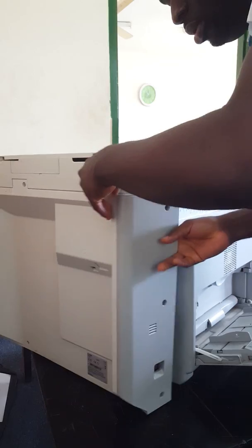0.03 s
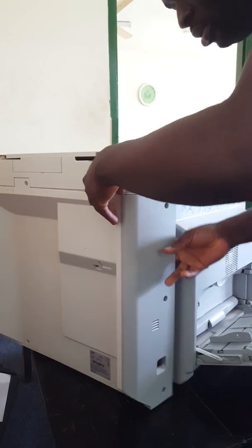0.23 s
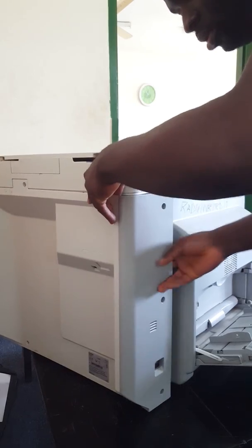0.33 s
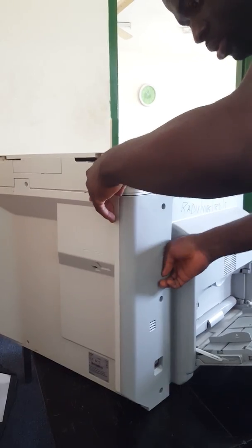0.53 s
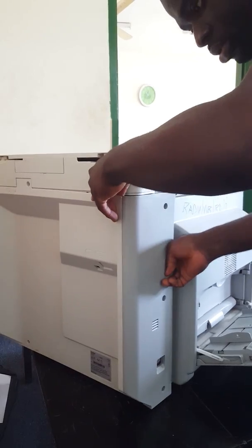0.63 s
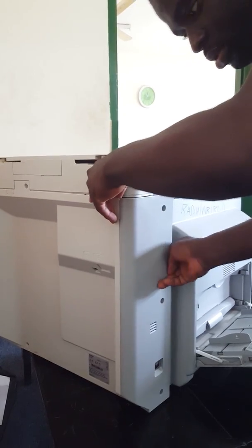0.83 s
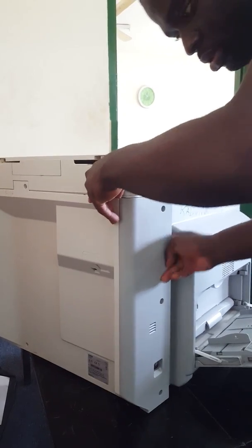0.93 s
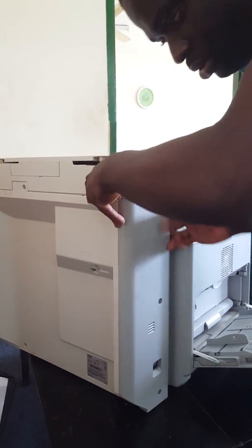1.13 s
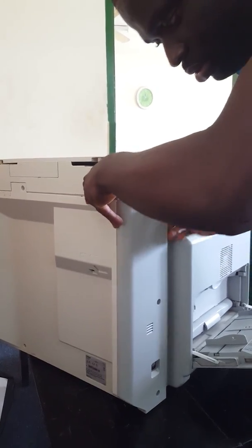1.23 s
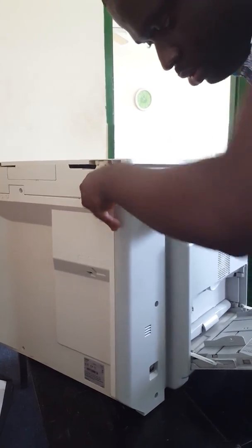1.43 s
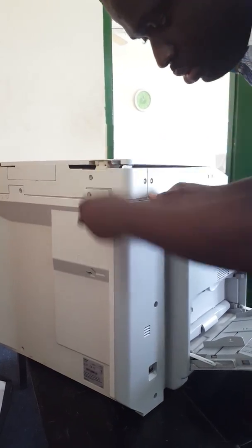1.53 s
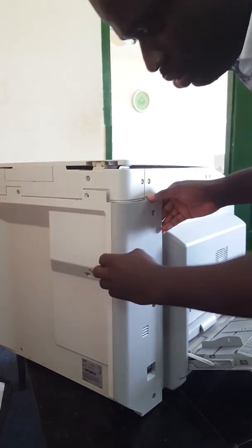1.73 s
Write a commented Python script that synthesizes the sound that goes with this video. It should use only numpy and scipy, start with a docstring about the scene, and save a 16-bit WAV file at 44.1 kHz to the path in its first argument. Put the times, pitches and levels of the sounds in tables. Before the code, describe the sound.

A large copier's plastic side panel slams at about 0.2 seconds, ringing briefly and booming the hollow cabinet. A dull knock and latch clicks follow around 0.5 to 0.6 seconds, then faint rubbing and ticks. At about 1.2 seconds the panel clatters shut in several quick knocks, with a smaller knock at 1.5. Steady noise and a low hum fill the small room underneath.

```python
"""Copier side panel pushed shut

A large copier's plastic panel, pushed home by hand in a small room, slams once, knocks and latches,
then clatters shut. Each blow rings the panel and booms the hollow cabinet. Between blows the panel
rubs on its frame and flexes, and its catches tick. Steady room noise and a low hum lie underneath."""
import sys
import numpy as np
from scipy import signal
from scipy.fft import rfft, irfft
from scipy.io import wavfile

SR = 44100
rng = np.random.default_rng(int(sys.argv[2]) if len(sys.argv) > 2 else 0)


def digitize_waveform(pressure):
    """Quantize a signal to 16-bit integers and store it at the path in sys.argv[1].

    Rows of a 2-D input are taken as channels; values are limited to [-1, 1].
    """
    field = np.atleast_2d(pressure).T
    bounded = np.clip(field, -1, 1)
    quanta = np.round(bounded * 32767).astype(np.int16)
    wavfile.write(sys.argv[1], SR, quanta)


N = 79380
TAIL_SAMPLES = 24576
BASS_SHELF_HZ, TREBLE_SHELF_HZ = 456, 1686

# room decay: f/Hz, t60/s
ROOM_DECAY = [(80, 0.75), (300, 0.45), (1000, 0.4), (3000, 0.26), (7000, 0.28), (14000, 0.11)]
# room field, left to right: f/Hz, correlation
ROOM_CORRELATION = [(60, 0.98), (160, 1), (350, 0.81), (700, 0.63), (1400, -0.33), (3000, 0.037), (8000, 0)]


def panel_knocks():
    """Each blow rattles and rings the panel and sets the cabinet booming."""
    # t/s, level/dB, bass/dB, treble/dB, panel ring/dB, cabinet boom/dB
    blows = [(0.1199, -29, -25, 0, -12, 6), (0.2326, -13.5, -6.5, 2.5, 1.5, 2),
             (0.2367, -21, 4, 17.5, -27, 0.5), (0.2556, -23.5, 13, -12, -9, 3),
             (1.072, -39.5, 17, -12, -25, -18), (1.2202, -24.5, 14, -9, -12, -21),
             (1.2371, -27.5, 14, -13.5, 10, -24), (1.2454, -22, 5, -3.5, -23, -38),
             (1.264, -25.5, -2, -18, 4.5, -28), (1.32, -31.5, 1, -29, 2, -4), (1.459, -42.5, -2, 4, 4, -8),
             (1.503, -27, 4, -17.5, -8, -7.5)]
    # panel resonances: f/Hz, level/dB, t60/s
    panel_modes = [(326, -12.5, 0.49), (458.5, -17.5, 0.41), (522, -10.5, 0.18), (604, -11, 0.12),
                   (662.3, -1, 0.15), (751, -11.5, 0.28), (837.5, -1.5, 0.19), (891, -7.5, 0.18),
                   (1259, -8, 0.26), (1402, -31, 0.22), (1678, -0.5, 0.1), (1841, -0.5, 0.11),
                   (2050, -36, 0.54), (2540, -10.5, 0.061), (2650, -23, 0.22), (3130, -25, 0.31)]
    # hollow cabinet resonances: f/Hz, level/dB, t60/s
    cabinet_modes = [(63.6, -10, 0.61), (78, -10, 0.27), (102, -15.5, 0.68), (175.5, -11.5, 0.29),
                     (199.7, -14, 0.7)]
    # f/Hz, level/dB
    blow_spectrum = [(30, -34), (80, -13.5), (250, -12), (420, -0.5), (720, -0.5), (1050, -4.5), (1750, -5),
                     (2600, -16), (4000, -27), (4600, -33.5), (7000, -46), (9800, -61.5), (11500, -47.5),
                     (16000, -52)]
    out = np.zeros((2, N))
    for start_s, db, bass_db, treble_db, ring_db, boom_db in blows:
        blow = colour(impact(contact_db=12), blow_spectrum, bass_db, treble_db)
        panel = amp(ring_db) * ring(panel_modes, rise_s=0.00065, treble_db=treble_db)
        boom = amp(boom_db) * ring(cabinet_modes, rise_s=0.019)
        add(out, start_s, amp(db) * (blow + panel + boom))
    return out


def catch_clicks():
    """Catches and small plastic parts snap and ring briefly."""
    # t/s, level/dB, treble/dB
    clicks = [(.0962, -61, 23.5), (.4155, -41.5, 6), (.429, -32.5, -8), (.5282, -29.5, -4),
              (0.5793, -25, 0), (.7003, -41.5, -4), (.8679, -34.5, -8), (1.051, -54, 11), (1.066, -43.5, 2),
              (1.2383, -42.5, 9), (1.2625, -33.5, 7), (1.5015, -36, 0.5)]
    # f/Hz, level/dB
    snap_spectrum = [(30, -30), (250, -3), (900, -10), (1500, -8.5), (2300, -10), (4000, -20.5),
                     (4600, -27.5), (7500, -38), (9800, -52), (11500, -43), (16000, -41)]
    # catch resonances: f/Hz, level/dB, t60/s
    catch_modes = [(943, 0, 0.092), (1294, -0.5, 0.13), (1864, -7, 0.1), (2140, -2, 0.07),
                   (2410, -23, 0.076), (2930, -23, 0.049), (3520, -6.5, 0.05), (3850, -12.5, 0.081),
                   (5540, -30, 0.2)]
    out = np.zeros((2, N))
    for start_s, db, treble_db in clicks:
        snap = colour(impact(contact_db=11.5), snap_spectrum, treble_db=treble_db)
        catch = ring(catch_modes, rise_s=0.0005, treble_db=treble_db)
        add(out, start_s, amp(db) * (snap + catch))
    return out


def panel_flex():
    """The panel gives under the hand: one low, damped tone per bump."""
    # t/s, level/dB, f/Hz, t60/s
    bumps = [(0.096, -30, 195.8, 0.24), (.157, -25, 341, 0.088), (.385, -32.5, 269.1, 0.4),
             (0.5102, -8, 410, 0.021), (0.531, -9.5, 376, 0.025), (0.603, -25.5, 189, 0.17),
             (0.641, -24, 236, 0.035), (0.662, -22, 254, 0.039), (1.112, -33.5, 185, 0.35),
             (1.251, -23.5, 178.8, 0.38), (1.43, -24.5, 343, 0.033), (1.496, -32, 63.1, 0.41),
             (1.524, -27.5, 187.7, 0.23)]
    out, t = np.zeros((2, N)), np.arange(TAIL_SAMPLES) / SR
    for start_s, db, hz, t60_s in bumps:
        envelope = rise(t, rise_s=0.0017) * decay(t, t60_s)
        add(out, start_s, amp(db) * envelope * np.sin(2 * np.pi * hz * t))
    return out + amp(-10) * room_echo(out)


def panel_rubs():
    """The panel slides on its frame, plastic on plastic, in many tiny slips."""
    # t/s, length/s, level/dB
    slides = [(0, 0.37, -45), (0.167, 0.041, -36.5), (0.399, 0.044, -39), (0.536, 0.059, -27.5),
              (0.771, 0.035, -38), (0.839, 0.073, -44), (1.062, 0.097, -48), (1.222, 0.06, -24.5),
              (1.457, 0.026, -37.5), (1.722, 0.028, -53)]
    # f/Hz, level/dB
    rub_spectrum = [(30, -22.5), (200, -5), (450, 1), (900, -2), (1900, -14.5), (3000, -24), (8000, -54),
                    (16000, -59)]
    slips_per_s, spread_db = 2000, 1
    slipping = rng.random(N) < slips_per_s / SR
    slips = unit(slipping * rng.standard_normal(N) * amp(spread_db * rng.standard_normal(N)))
    envelope = np.zeros((2, N))
    for start_s, length_s, db in slides:
        add(envelope, start_s, amp(db) * np.sqrt(np.hanning(round(length_s * SR)).clip(0)))
    friction = colour(envelope * slips, rub_spectrum)
    return 0.88 * friction + 0.73 * room_echo(friction)


def impact(contact_db):
    """A sharp contact, the plastic's brief rattle and the room's answer."""
    # f/Hz, t60/s
    rattle_decay = [(100, 0.095), (600, 0.12), (2000, 0.094), (5000, 0.08), (14000, 0.045)]
    # near field, left to right: f/Hz, correlation
    near_correlation = [(100, 0.95), (700, .95), (1500, .6), (3000, 0.02), (8000, 0)]
    room_db, rattle_db = -5.5, 1.5
    t = np.arange(TAIL_SAMPLES) / SR
    out = amp(room_db) * noise_tail(ROOM_CORRELATION, ROOM_DECAY, TAIL_SAMPLES) * rise(t, rise_s=0.008)
    add(out, 0, amp(rattle_db) * noise_tail(near_correlation, rattle_decay, TAIL_SAMPLES // 2))
    out[:, 0] -= amp(contact_db)
    return out


def ring(modes, rise_s, treble_db=0):
    """Modes struck from rest; the higher ones reach the two microphones out of phase."""
    t, out = np.arange(TAIL_SAMPLES) / SR, 0
    for k, (hz, db, t60_s) in enumerate(modes):
        correlation = np.clip(at_hz(ROOM_CORRELATION, hz), -1, 1)
        offset_rad = np.arccos(correlation) * rng.choice([-.5, .5])
        tone = np.sin(2 * np.pi * hz * t + np.array([[offset_rad], [-offset_rad]]))
        gain = (-1) ** k * amp(db + treble_db * treble_share(hz))
        out = out + gain * decay(t, t60_s) * tone
    return out * rise(t, rise_s)


def room_echo(x):
    """Diffuse reverberation of the small room."""
    tail = unit(noise_tail(ROOM_CORRELATION, ROOM_DECAY, TAIL_SAMPLES)) / np.sqrt(TAIL_SAMPLES)
    return signal.fftconvolve(x, tail, axes=1)[:, :N]


def room_noise():
    """Steady noise with a wavering low hum."""
    # f/Hz, level/dB
    noise_spectrum = [(15, -24.5), (25, -5), (42, -5.5), (60, -5), (85, 1.5), (135, -3), (184, -4),
                      (235, -4), (330, -1), (480, -7.5), (750, -7.5), (1360, -10.5), (2730, -23.5),
                      (4500, -37), (7000, -47), (9800, -55), (12000, -50), (16000, -45.5)]
    # f/Hz, level/dB
    hum_tones = [(188, -46.5), (334, -65.5)]
    _, white = stereo_spectra(ROOM_CORRELATION, N)
    noise = amp(-39) * colour(irfft(white, N), noise_spectrum)
    t, hum, width_hz = np.arange(N) / SR, 0, 29
    for hz, db in hum_tones:
        phase = 2 * np.pi * hz * t
        hum += amp(db) * (drift(width_hz) * np.sin(phase) + drift(width_hz) * np.cos(phase))
    return noise + hum


def noise_tail(correlations, decays, size):
    """Dense stereo ring; each band dies at its own rate."""
    hz, spectra = stereo_spectra(correlations, size)
    centres_hz, t60s_s = np.transpose(decays)
    t, out = np.arange(size) / SR, 0
    for band, t60_s in zip(np.eye(len(decays)), t60s_s):
        band_gain = at_hz(list(zip(centres_hz, band)), hz)
        out += irfft(spectra * band_gain) * decay(t, t60_s)
    return out


def stereo_spectra(correlations, size):
    """Frequencies and spectra of white noise at two partly correlated microphones."""
    hz = np.fft.rfftfreq(size, 1 / SR)
    mid, side = rfft(rng.standard_normal((2, size)))
    correlation = np.clip(at_hz(correlations, hz), -1, 1)
    mid *= np.sqrt((1 + correlation) / 2)
    side *= np.sqrt((1 - correlation) / 2)
    return hz, np.array([mid + side, mid - side])


def colour(x, spectrum, bass_db=0, treble_db=0):
    """Minimum-phase filter: a unit-energy curve times bass and treble shelves."""
    hz = abs(np.fft.fftfreq(4096, 1 / SR))
    shelves_db = bass_db / (1 + (hz / BASS_SHELF_HZ) ** 2) + treble_db * treble_share(hz)
    gain = unit(amp(at_hz(spectrum, hz))) * amp(shelves_db)
    response = np.exp(np.conj(signal.hilbert(np.log(gain + 1e-7))))
    taps = np.fft.ifft(response).real[:len(hz) // 2]
    return signal.fftconvolve(x, taps[None], axes=1)[:, :x.shape[1]]


def drift(width_hz):
    """Slow random drift, rms 1."""
    lowpass = np.exp(-(np.fft.rfftfreq(N, 1 / SR) / width_hz) ** 2)
    return unit(irfft(rfft(rng.standard_normal(N)) * lowpass, N))


def treble_share(hz):
    return hz ** 2 / (hz ** 2 + TREBLE_SHELF_HZ ** 2)


def rise(t, rise_s):
    return 1 - np.exp(-t / rise_s)


def decay(t, t60_s):
    return np.exp(-np.log(1000) * t / t60_s)


def amp(db):
    return 10 ** (np.asarray(db) / 20)


def unit(x):
    """Scale to rms 1."""
    return x / np.sqrt(np.mean(x ** 2) + 1e-20)


def at_hz(points, hz):
    """Interpolate a table over log frequency."""
    points_hz, values = np.transpose(points)
    return np.interp(np.log(hz + 1), np.log(points_hz + 1), values)


def add(mix, start_s, sound):
    """Mix in place, cut at the end of the mix."""
    part = mix[:, max(round(start_s * SR), 0):][:, :sound.shape[-1]]
    part += sound[..., :part.shape[1]]


def scene():
    """The panel's sounds over the room noise."""
    left_db = -0.42
    mix = panel_knocks() + catch_clicks() + panel_flex() + panel_rubs() + room_noise()
    return mix * amp([[left_db], [0]])


def record(dry):
    """Microphone bass roll-off and upper band limit."""
    low_hz, high_hz = 51.7, 15950
    highpass = signal.butter(3, low_hz, "highpass", fs=SR, output="sos")
    lowpass = signal.firwin(511, high_hz, window=("kaiser", 9), fs=SR)
    return signal.oaconvolve(signal.sosfilt(highpass, dry), lowpass[None], "same")


dry = scene()
out = record(dry)
digitize_waveform(out)
```